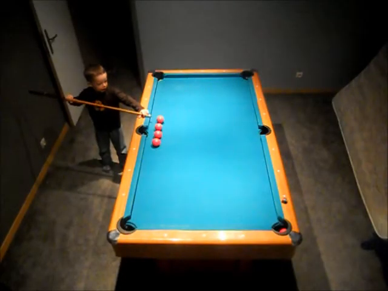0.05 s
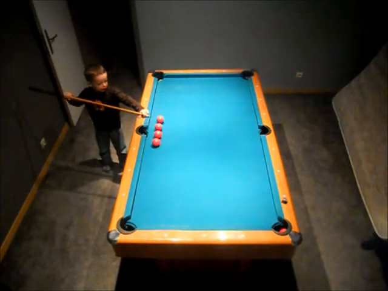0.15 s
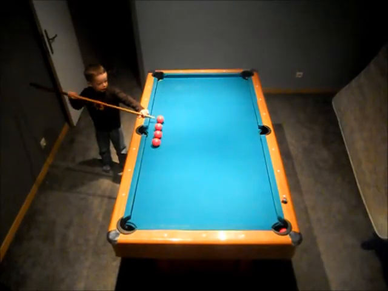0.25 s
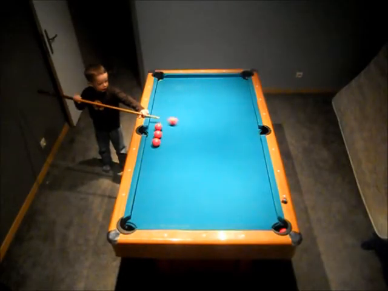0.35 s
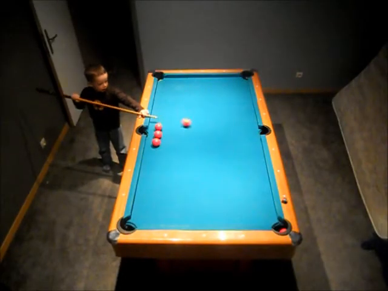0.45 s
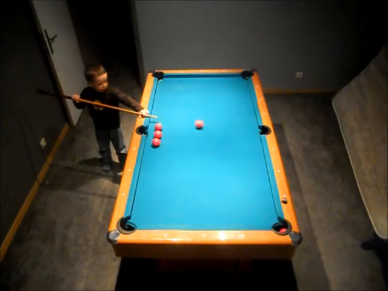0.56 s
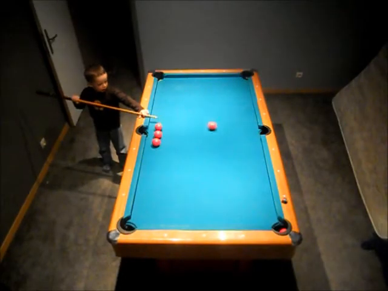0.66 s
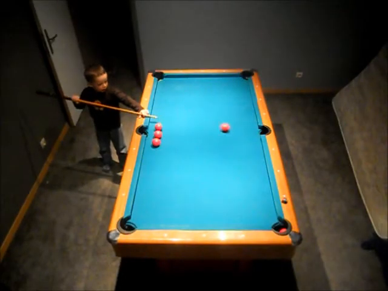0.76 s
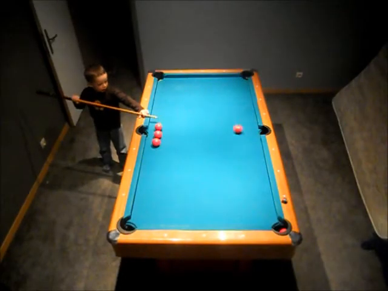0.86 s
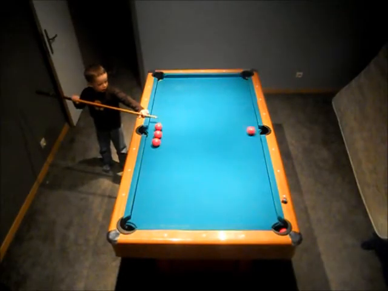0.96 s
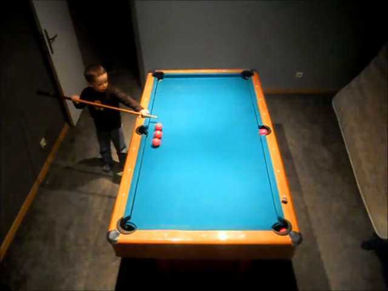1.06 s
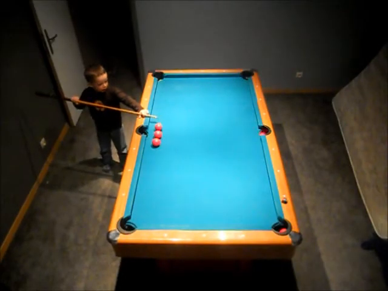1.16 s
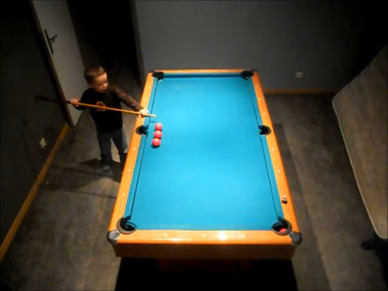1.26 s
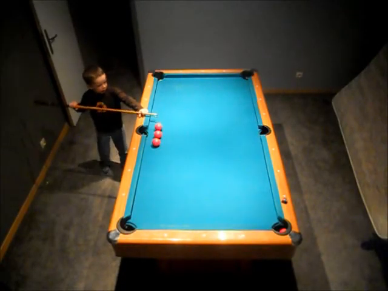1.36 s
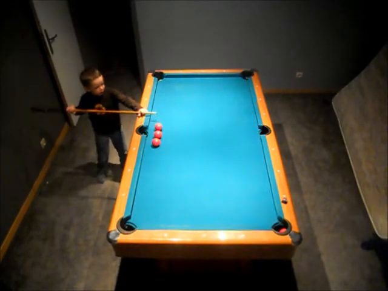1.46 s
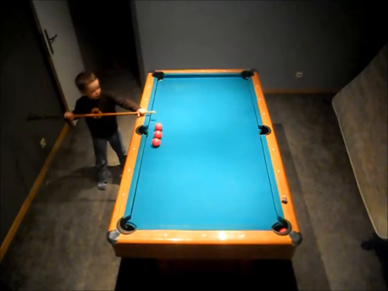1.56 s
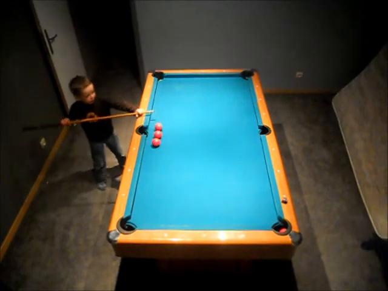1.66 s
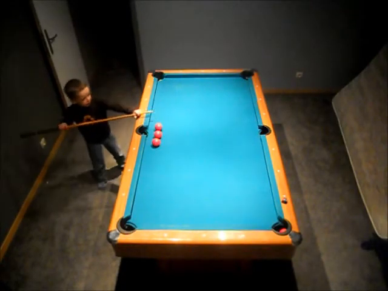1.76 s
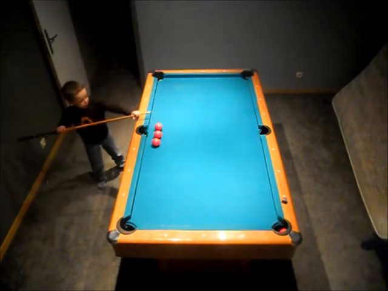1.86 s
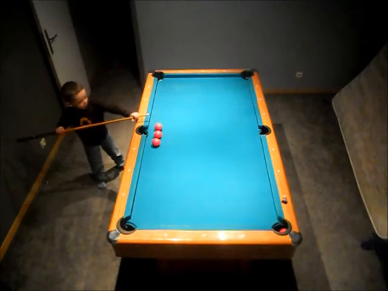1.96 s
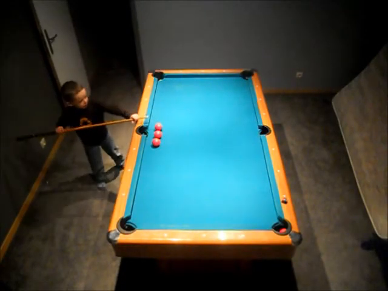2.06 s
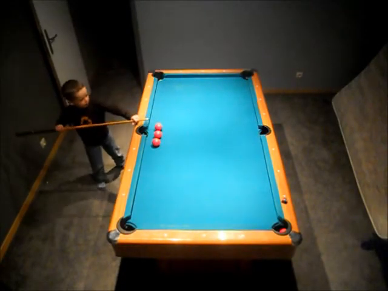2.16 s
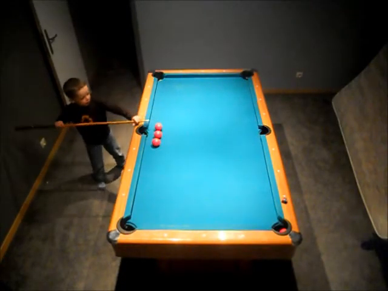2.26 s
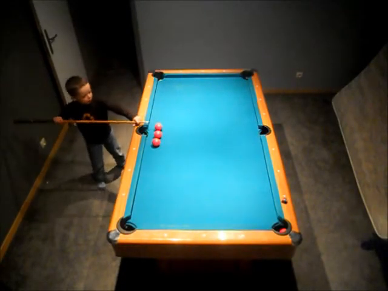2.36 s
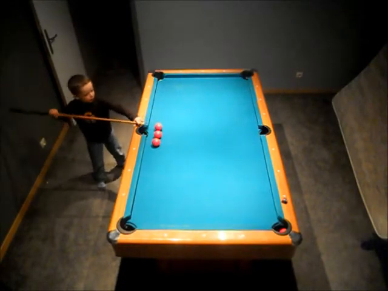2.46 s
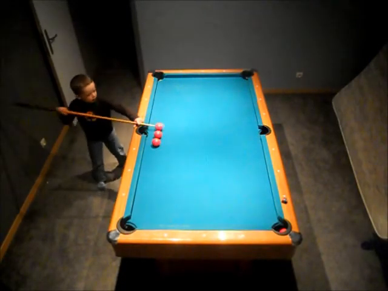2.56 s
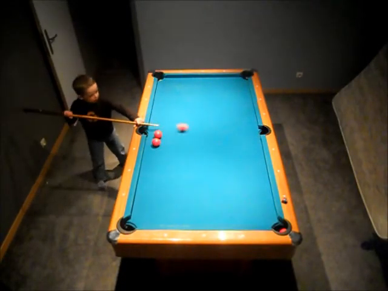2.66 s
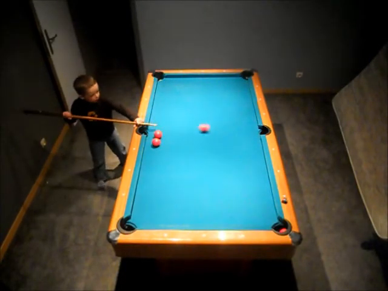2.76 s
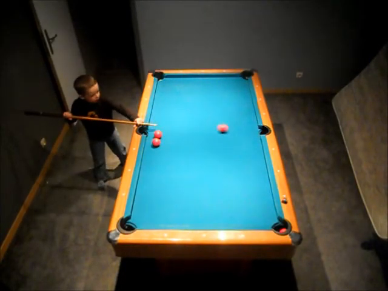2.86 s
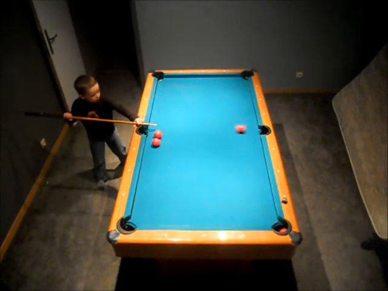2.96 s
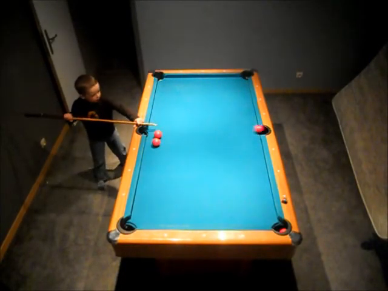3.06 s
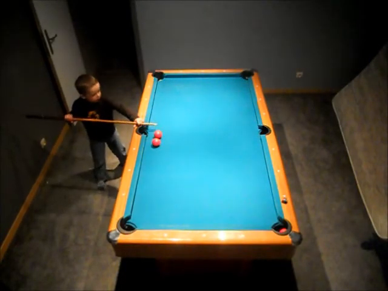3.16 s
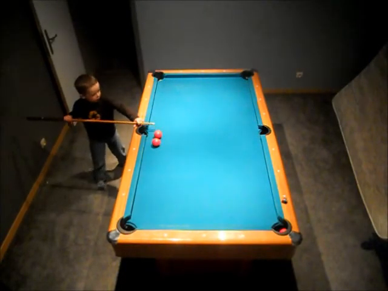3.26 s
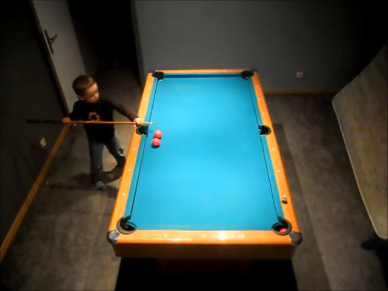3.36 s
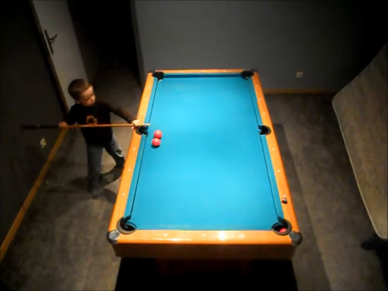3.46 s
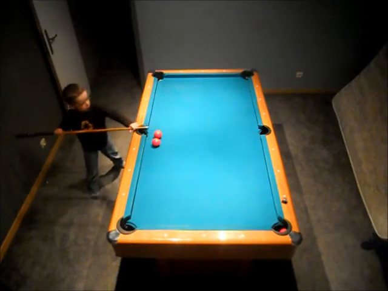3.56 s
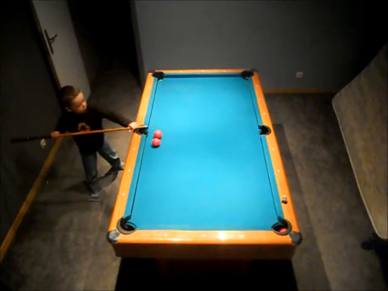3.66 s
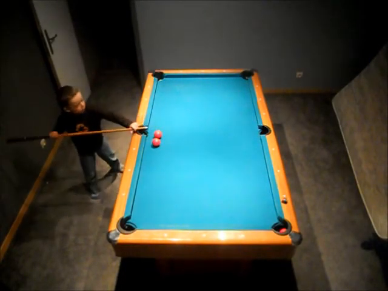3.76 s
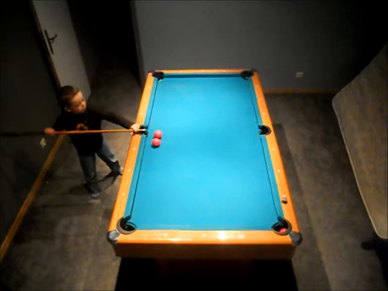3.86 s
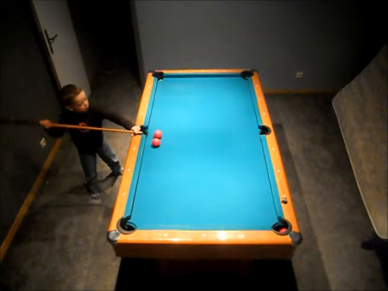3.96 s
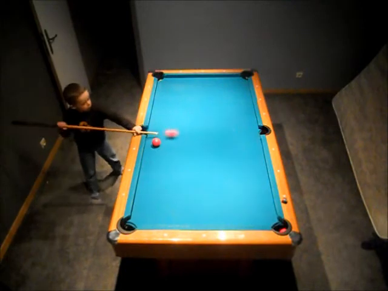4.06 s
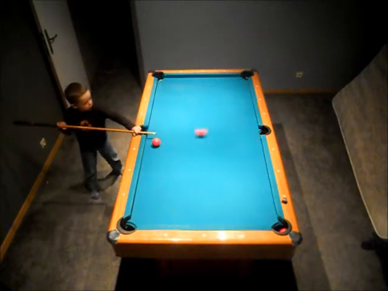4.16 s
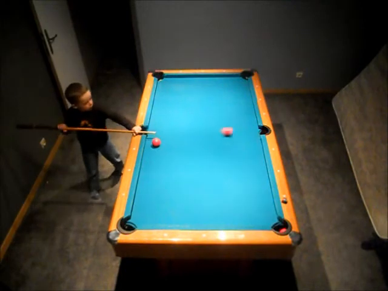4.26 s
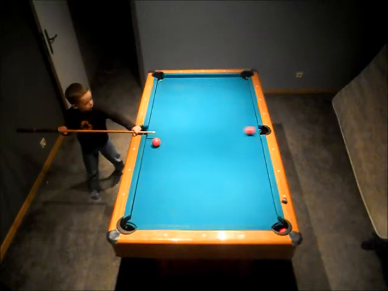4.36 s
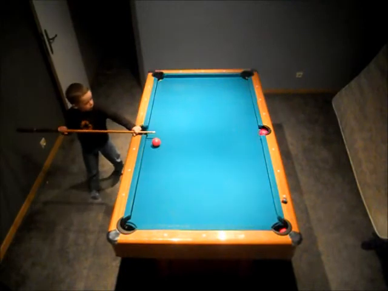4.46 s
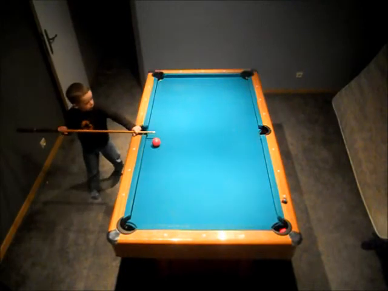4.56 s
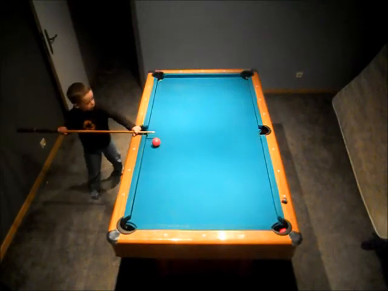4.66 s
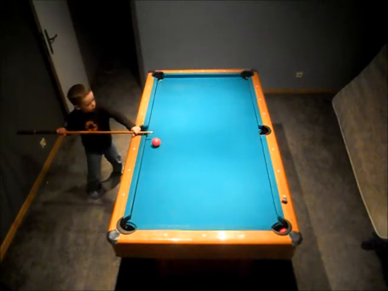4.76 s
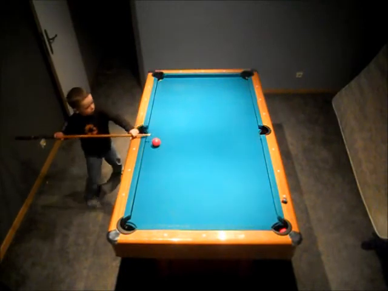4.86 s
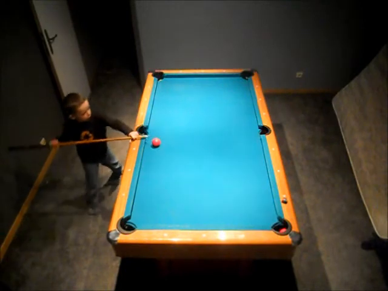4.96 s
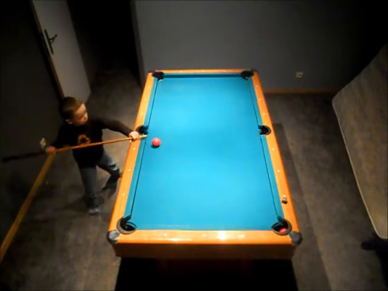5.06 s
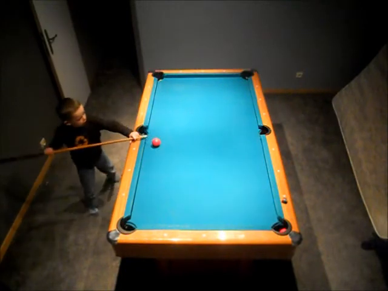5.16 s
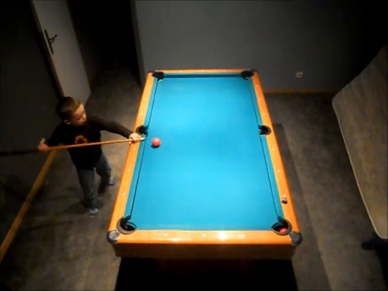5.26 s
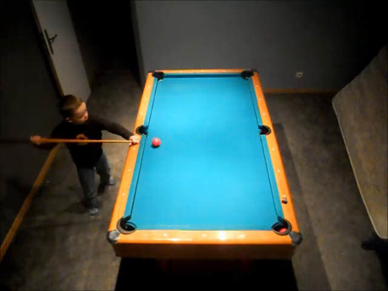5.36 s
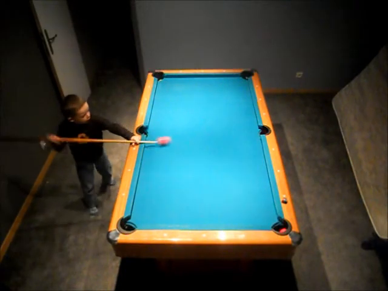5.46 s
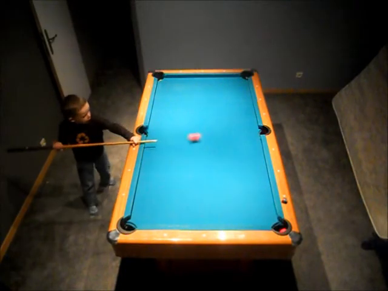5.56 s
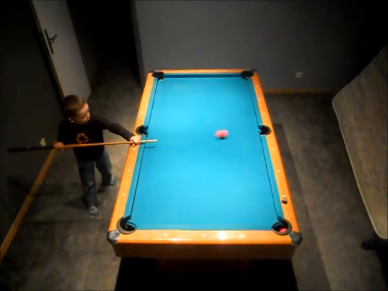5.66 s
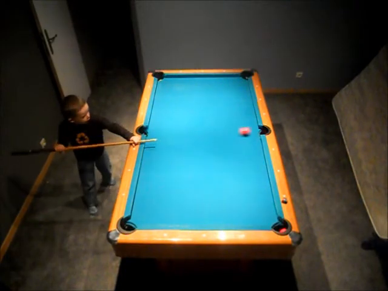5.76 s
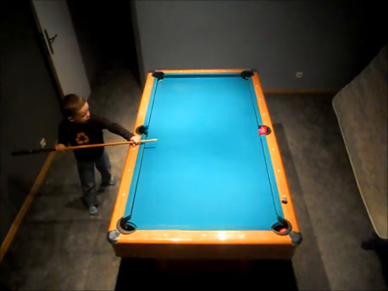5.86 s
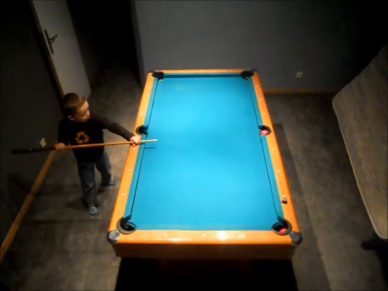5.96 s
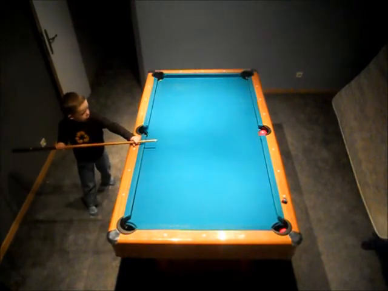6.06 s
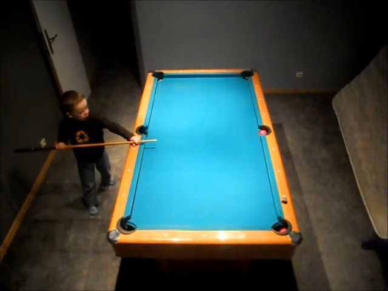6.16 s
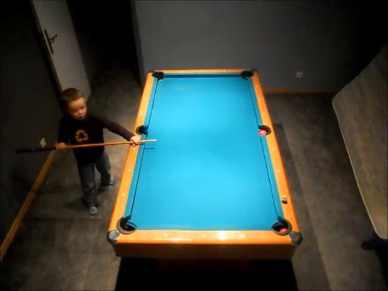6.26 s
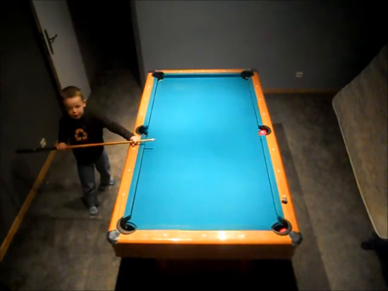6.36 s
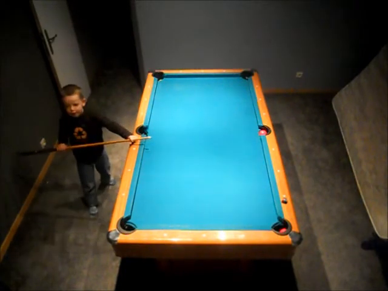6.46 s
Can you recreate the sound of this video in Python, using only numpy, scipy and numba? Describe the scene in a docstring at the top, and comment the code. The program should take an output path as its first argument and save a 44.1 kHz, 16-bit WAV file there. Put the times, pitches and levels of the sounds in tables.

```python
"""Pool shots in a bare room

Four balls are struck across a slate table in a bare home room and drop into the side pocket.
Each blow is three band-limited pulses (thud, knock, click) that ring the table's modes and a noise-tail room.
Rolling is noise through those modes; leather rustle is sparse shaped grains; the frame's modes boom on landing.
A distant microphone adds hiss; its gain control ducks on loud blows, holds, then creeps back up."""
import sys
import numpy as np
from scipy import signal
from scipy.fft import rfft, irfft
from scipy.io import wavfile
from numba import njit

SR = 44100
rng = np.random.default_rng(int(sys.argv[2]) if len(sys.argv) > 2 else 0)


def generate_wav(signal):
    """Clip the signal to [-1, 1] and save it as 16-bit WAV at the path in sys.argv[1]."""
    frames = np.transpose(np.atleast_2d(signal))
    scaled = np.clip(frames, -1, 1) * 32767
    pcm = np.round(scaled).astype(np.int16)
    wavfile.write(sys.argv[1], SR, pcm)


N = 287091  # length in samples

# Source levels below come ahead of the room, the filters and the microphone's gain control.
# Microphone hiss, spectral shape: [f/Hz, relative density/dB per Hz]
HISS_SPECTRUM = [(53, -37), (90, -2), (209, -6.5), (368, -3.5), (572, -3), (4730, -10.5), (7970, -13),
                 (10100, -13.5), (11000, -5.5), (14300, -72), (22000, -120)]
# Cue tip on ball: [t/s, thud level/dB, knock level/dB, click level/dB, shaft crack level/dB]
STROKES = [(0.3079, -4.5, -9.5, -22, -17), (2.5915, -2, -1.5, -12, -14.5), (4.047, -1, 1, -10, -22),
           (5.4667, -4.5, 2.5, -14.5, -20.5)]
# Light touches of the cue between strokes: [t/s, thud level/dB, knock level/dB, click level/dB]
TOUCHES = [(2.5199, -42.5, -16, -22.5), (2.585, -56, -40, -24), (4.029, -46.5, -41.5, -51),
           (4.038, -41, -36, -38), (4.931, -68.5, -46.5, -66), (5.427, -29.5, -45.5, -44.5)]
# The struck ball hops and meets the cloth again: [t/s, thud level/dB, knock level/dB]
HOPS = [(0.392, -45.5, -41), (2.683, -14, -43), (4.118, -6.5, -10.5), (5.527, -5, -8.5)]
# Modes of slate and wooden bed: [f/Hz, relative level/dB, t60/s]
TABLE_MODES = [(92.6, -14.5, 1), (165.5, -7, 0.36), (223.4, -3, 0.62), (271, -6.5, .25), (262.4, 5, 0.4),
               (311.5, -13.5, 0.98), (386, -12.5, 0.39), (391.1, 4.5, 0.32), (409.4, -24, 0.22),
               (470.6, -1, 0.34), (514.7, -0.5, 0.46), (582, 0, 0.48), (672, -15, 0.51), (966, -5.5, 0.19),
               (1177, -9, 0.4)]
# Lasting ring of the ball: [f/Hz, relative level/dB, t60/s]
BALL_MODES = [(2225, -48, 0.14), (2770, -52, .12), (3240, -62, .08), (4200, -65, 0.07), (4340, -63, 0.07)]
# Crack of the cue shaft: [f/Hz, relative level/dB, t60/s]
SHAFT_MODES = [(2810, -4.5, 0.03), (3480, -17.5, 0.025), (3710, 4, 0.0093), (4480, -6.5, .025),
               (5000, -8.5, 0.042)]
# Decay of the room once it has set in: [f/Hz, t60/s]
ROOM_T60 = [(60, .5), (160, 0.26), (300, 0.4), (600, 0.19), (1100, 0.42), (2900, 0.2), (7700, .22)]
# Colour of the room's reflections: [f/Hz, relative level/dB]
ROOM_COLOUR = [(60, 9), (200, 1), (600, -9.5), (1500, -9), (4000, -4.5), (10000, -1)]
# Each ball's way into the pocket: [t at the jaw/s, roll level/dB, thud f/Hz, knock f/Hz, rustle level/dB]
DROPS = [(1.086, -42.5, 395, 800, -32.5), (3.11, -45.5, 265, 1160, -26.5), (4.456, -50.5, 373, 880, -15),
         (5.875, -41.5, 361, 810, -17)]
# Ball on pocket jaw, leather and the balls lying there:
# [t/s, thud level/dB, knock level/dB, click level/dB]
POCKET_HITS = [(1.088, -28.5, -24.5, -17), (1.102, -29, -31, -47), (1.128, -14, -42, -17.5),
               (1.16, -17.5, -53, -17), (1.233, -35, -70, -29), (3.112, -18.5, -13, -8),
               (3.127, -14, -22.5, -38), (3.156, -36.5, -6.5, -11), (3.187, -24, -10, -11.5),
               (3.282, -40, -14.5, -30), (3.328, -37.5, -17.5, -42), (4.455, -48.5, -8.5, 0.5),
               (4.46, -7.5, -5.5, -25), (4.475, -1.5, 5, -7.5), (4.5, -5.5, -16, -37),
               (4.54, -20.5, -27, -16.5), (4.58, -13, -35, -45), (5.876, -12.5, -29, -3.5),
               (5.896, -4, 6, -44), (5.921, -6, -1, -5.5), (5.998, -35, -20, -18), (6.031, -16, -18, -37)]
# Leather friction, spectral shape: [f/Hz, relative density/dB per Hz]
LEATHER_SPECTRUM = [(180, -41.5), (400, 2.5), (1000, 0.5), (1800, -5), (2800, -14), (5000, -26),
                    (10000, -41), (20000, -68)]
# Ball comes to rest on the pocket bottom: [t/s, frame boom level/dB]
LANDINGS = [(1.223, -19), (3.179, -13), (4.551, -20), (5.949, -32.5)]
# Modes of the table frame: [f/Hz, relative level/dB, t60/s]
FRAME_MODES = [(61, -13, 0.21), (67.6, -0.5, 0.25), (63.6, -17, 1.6), (69.4, -20, 1.5), (76, -29, 1.0)]

# Background
HISS_DB, RUMBLE_DB, RUMBLE_TOP_HZ = -52.5, -48.5, 22
WHINE_HZ, WHINE_DB = 7800, -72
# Rolling; the settling level is relative to each ball's roll level
ROLL_RISE_S, FLOOR_HUM_DB = .05, -66.5
SETTLE_DB, SETTLE_FADE_DB_PER_S = 8, 55.5
# Centres of the contact pulses
TIP_THUD_HZ, STROKE_KNOCK_HZ, STROKE_CLICK_HZ = 382, 800, 2270
TOUCH_KNOCK_HZ, TOUCH_CLICK_HZ, POCKET_CLICK_HZ = 1420, 2554, 2472
BALL_FADE_DB_PER_S = 171
RUSTLE_DELAY_S, RUSTLE_FADE_DB_PER_S = 0.015, 123
# Room
ROOM_DB, ROOM_RISE_S, CUE_LINGER_S, BLOW_LOW_CUT_HZ = -18.5, 0.0013, .16, 75
# Microphone and its gain control; DUCK_S and RECOVER_S are time constants
MIC_LOW_CUT_HZ, CUTOFF_HZ = 36, 11700
FULL_GAIN_DB, LOUD_DB = 13.5, -4
DUCK_S, HOLD_S, RECOVER_S = 0.0054, 0.81, 0.54


def from_db(db):
    """Decibels to gain."""
    return 10 ** (np.asarray(db) / 20)


def rms_one(x):
    """Scale to unit rms."""
    return x / np.sqrt(np.mean(x ** 2) + 1e-20)


def band(x, low_hz, high_hz):
    """Butterworth band-pass."""
    sos = signal.butter(2, [low_hz, high_hz], "band", fs=SR, output="sos")
    return signal.sosfilt(sos, x + 1e-18)


def at_hz(points, hz):
    """Read a table of points on a log-frequency axis."""
    point_hz, value = np.array(points).T
    return np.interp(np.log(hz), np.log(point_hz), value)


def coloured(x, spectrum):
    """Shape a noise by a spectrum; rms 1."""
    hz = np.maximum(np.fft.rfftfreq(len(x), 1 / SR), 10)
    return rms_one(irfft(rfft(x) * from_db(at_hz(spectrum, hz)), len(x)))


def ring(x, hz, t60):
    """Two-pole resonator: a unit impulse sets a decaying sine of starting height 1 ringing."""
    radius = from_db(-60 / (t60 * SR))
    w = 2 * np.pi * hz / SR
    return signal.lfilter([0, np.sin(w)], [1, -2 * radius * np.cos(w), radius * radius], x + 1e-18)


def impulses(times, db):
    """One impulse for each event."""
    out = np.zeros(N)
    out[(np.asarray(times) * SR).astype(int)] = from_db(db)
    return out


def struck(modes, times, db, spread_db):
    """Every blow strikes each mode with a strength of its own."""
    chance = rng.normal(0, 1, (len(times), len(modes)))
    out = np.zeros(N)
    for k, (hz, mode_db, t60) in enumerate(modes):
        blows = impulses(times, db + mode_db + spread_db * chance[:, k])
        out += ring(blows, hz, t60)
    return out


def fading(times, db, fade_db_per_s):
    """Sum of gains that jump to their level at each time and then fade steadily in dB."""
    t = np.arange(N) / SR
    gain = np.zeros(N)
    for s, top_db in zip(times, db):
        gain += (t > s) * from_db(top_db - fade_db_per_s * np.maximum(t - s, 0))
    return gain


def background():
    """Microphone hiss with a thin whine, and the low rumble of the house, all from filtered noise."""
    hiss = from_db(HISS_DB) * coloured(rng.standard_normal(N), HISS_SPECTRUM)
    whine = rms_one(band(rng.standard_normal(N), WHINE_HZ - 30, WHINE_HZ + 30))
    rumble = rms_one(band(rng.standard_normal(N), 8.2, RUMBLE_TOP_HZ))
    return hiss + from_db(WHINE_DB) * whine + from_db(RUMBLE_DB) * rumble


def roll():
    """Low noise through the slate: a constant faint hum, a steady roll, a fading burst as a ball settles."""
    t = np.arange(N) / SR
    jaw_s, roll_db = np.transpose(DROPS)[:2]
    rolling = np.zeros(N)
    for stroke, db, end in zip(STROKES, roll_db, jaw_s):
        rise = np.clip((t - stroke[0]) / ROLL_RISE_S, 0, 1)
        rolling += from_db(db) * rise * (t < end)
    landing_s = np.transpose(LANDINGS)[0]
    settling = fading(landing_s, roll_db + SETTLE_DB, SETTLE_FADE_DB_PER_S)
    gain = rolling + settling + from_db(FLOOR_HUM_DB)
    noise = rng.standard_normal(N)
    bed = sum(from_db(db) * ring(noise, hz, t60) for hz, db, t60 in TABLE_MODES)
    rumble = band(rms_one(bed) + from_db(18.5) * noise, 100, 308)
    return gain * rms_one(rumble)


def pulse(hz, octaves):
    """A short contact: an impulse twice through a band around hz, peak 1."""
    edges = hz / 2 ** (octaves / 2), hz * 2 ** (octaves / 2)
    shape = band(band(np.arange(2000) == 0, *edges), *edges)
    return shape / np.abs(shape).max()


def contacts(rows, thud_hz, knock_hz, click_hz, edge_db):
    """Each contact is three short pulses, soft to hard, and a hard edge at edge_db relative to the click."""
    out = np.zeros(N + 2000)
    columns = np.broadcast_arrays(*np.transpose(rows), thud_hz, knock_hz, click_hz)
    for s, thud_db, knock_db, click_db, low_hz, mid_hz, high_hz in zip(*columns):
        at = int(s * SR)
        blow = out[at:at + 2000]  # a view: adding here adds to the output
        blow += from_db(thud_db) * pulse(low_hz, octaves=1.88)
        blow -= from_db(knock_db) * pulse(mid_hz, octaves=1.5)
        blow += from_db(click_db) * pulse(high_hz, octaves=1.25)
        blow -= from_db(click_db + edge_db) * pulse(5800, octaves=1.4)
    return out[:N]


def table(rows, table_db):
    """The thud of every contact rings slate and wooden bed, which radiate no deep bass."""
    times, thud_db = np.transpose(rows)[:2]
    rings = struck(TABLE_MODES, times, thud_db + table_db, spread_db=3.5)
    return band(rings, 90, 1700)


def ball_ring():
    """Faint lasting ring of the struck ball, its modes driven by noise as scattered echoes blur it."""
    times, thud_db = np.transpose(STROKES)[:2]
    shiver = fading(times, thud_db, BALL_FADE_DB_PER_S) * rng.standard_normal(N)
    return sum(from_db(db) * ring(shiver, hz, t60) for hz, db, t60 in BALL_MODES)


def shaft_crack():
    """The shaft's short modes crack 3 ms after the tip meets the ball."""
    times, crack_db = np.transpose(STROKES)[[0, 4]]
    return struck(SHAFT_MODES, times + .003, crack_db, spread_db=3.0)


def room(x, linger_s):
    """Direct sound plus reflections: noise that builds up, then dies band by band.

    Each call is a new place in the room. The heavy table keeps feeding the lows, so their decay sets in late."""
    t = np.arange(SR) / SR
    edges = 50 * 2 ** np.arange(0, 8.1, .5)  # half-octave bands
    white = rng.standard_normal((2, SR))  # neighbouring bands use different noises
    tail = np.zeros(SR)
    for k, (low, high) in enumerate(zip(edges, edges[1:])):
        hz = np.sqrt(low * high)
        knee = linger_s / (1 + (hz / 1300) ** 2)
        age = np.sqrt(t ** 2 + knee ** 2) - knee
        level_db = at_hz(ROOM_COLOUR, hz) - 60 * age / at_hz(ROOM_T60, hz)
        tail += band(white[k % 2], low, high) * from_db(level_db)
    tail *= 1 - np.exp(-t / ROOM_RISE_S)
    reflections = signal.fftconvolve(x, tail)[:N]
    heard = from_db(-3.5) * x + from_db(ROOM_DB) * reflections
    return band(heard, BLOW_LOW_CUT_HZ, .45 * SR)


def cue():
    """Tip blows, touches and ball hops ring the table; full strokes add ball ring and shaft crack."""
    hops = [(*row, row[2] - 16) for row in HOPS]  # click 16 dB below the knock
    blows = [row[:4] for row in STROKES] + hops
    tip = contacts(blows, TIP_THUD_HZ, STROKE_KNOCK_HZ, STROKE_CLICK_HZ, edge_db=-0.5)
    tip = tip + contacts(TOUCHES, TIP_THUD_HZ, TOUCH_KNOCK_HZ, TOUCH_CLICK_HZ, edge_db=-13.5)
    bed = table(blows + TOUCHES, table_db=-9.0)
    ball = ball_ring()
    shaft = shaft_crack()
    into_room = tip + from_db(-16.0) * shaft + from_db(-22.5) * bed
    return shaft + ball + bed + room(into_room, linger_s=CUE_LINGER_S)


def pocket_contacts():
    """Blows on jaw, leather and lying balls, with thud and knock pitched for each ball."""
    jaw_s, _, thud_hz, knock_hz, _ = np.transpose(DROPS)
    ball = np.searchsorted(jaw_s[1:] - .1, np.transpose(POCKET_HITS)[0])  # which ball makes each contact
    return contacts(POCKET_HITS, thud_hz[ball], knock_hz[ball], POCKET_CLICK_HZ, edge_db=-11)


def leather():
    """Uneven grains of friction, dying away as the ball settles."""
    sizes = from_db(3.0 * np.minimum(rng.exponential(1, N), 4))
    present = rng.random(N) < 300 / SR  # about 300 grains per second
    grains = rng.standard_normal(N) * sizes * present
    times, rustle_db = np.transpose(DROPS)[[0, 4]]
    gain = fading(times + RUSTLE_DELAY_S, rustle_db, RUSTLE_FADE_DB_PER_S)
    return gain * coloured(grains, LEATHER_SPECTRUM)


def frame_boom():
    """Each landing strikes the low modes of the frame."""
    times, boom_db = np.transpose(LANDINGS)
    return band(struck(FRAME_MODES, times, boom_db, spread_db=1.5), 50, 90)


def pocket():
    """Contacts and rustle heard in the room, with the ringing table and the boom of the frame."""
    in_room = room(pocket_contacts() + leather(), linger_s=0.06)
    return in_room + table(POCKET_HITS, table_db=-14.0) + frame_boom()


def scene():
    """The background, the roll, and both ends of each shot."""
    return (background() + roll() + cue() + pocket())[None]


@njit
def gain_curve(peak_db, full_db, loud_db, duck, hold, recover):
    """Gain in dB: falls while the output is too loud, waits, then creeps back to full."""
    out, gain_db, wait = np.empty(len(peak_db)), full_db, 0.0
    for i in range(len(peak_db)):
        over = peak_db[i] + gain_db - loud_db
        if over > 0:
            gain_db -= over * duck
            wait = hold
        elif wait > 0:
            wait -= 1
        else:
            gain_db += (full_db - gain_db) * recover
        out[i] = gain_db
    return out


def record(dry):
    """Distant microphone: thinned bass, gain control, treble roll-off, overload clipping, steep cut."""
    low_cut = signal.butter(1, MIC_LOW_CUT_HZ, "high", fs=SR, output="sos")
    dry = signal.sosfilt(low_cut, dry)
    power = signal.lfilter([.01], [1, -.99], dry[0] ** 2)  # smoothed over about 100 samples
    peak_db = 10 * np.log10(2 * power + 1e-12)  # peak of a sine of that power
    gain_db = gain_curve(peak_db, FULL_GAIN_DB, LOUD_DB,
                         1 / (DUCK_S * SR), HOLD_S * SR, 1 / (RECOVER_S * SR))
    roll_off = signal.cheby2(10, 40, 11300, fs=SR, output="sos")
    amplified = signal.sosfilt(roll_off, dry * from_db(gain_db))
    clipped = np.clip(amplified, -.95, .95)
    steep_cut = signal.cheby2(12, 60, CUTOFF_HZ, fs=SR, output="sos")
    return signal.sosfilt(steep_cut, clipped)


dry = scene()
out = record(dry)
generate_wav(out)
```